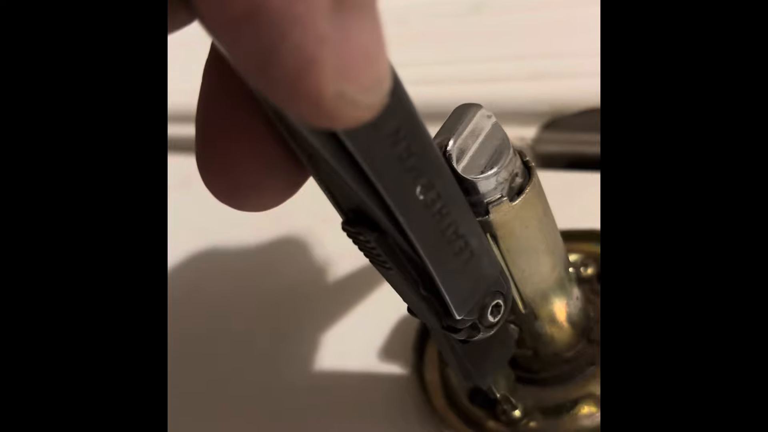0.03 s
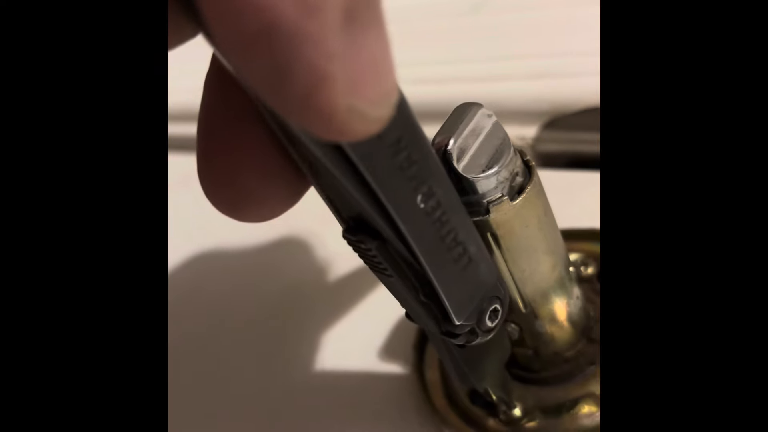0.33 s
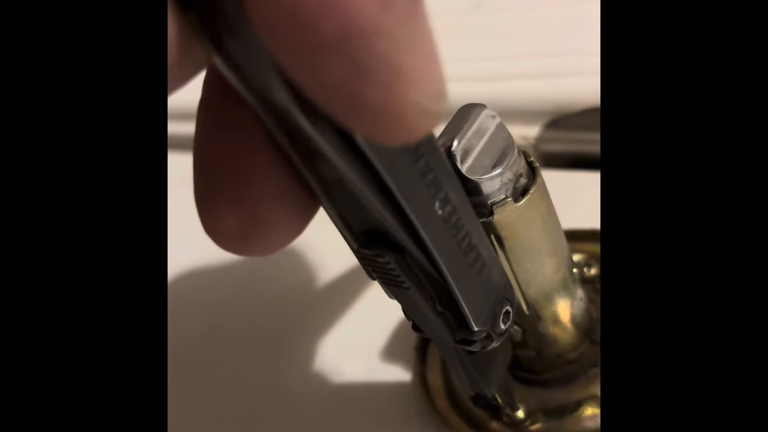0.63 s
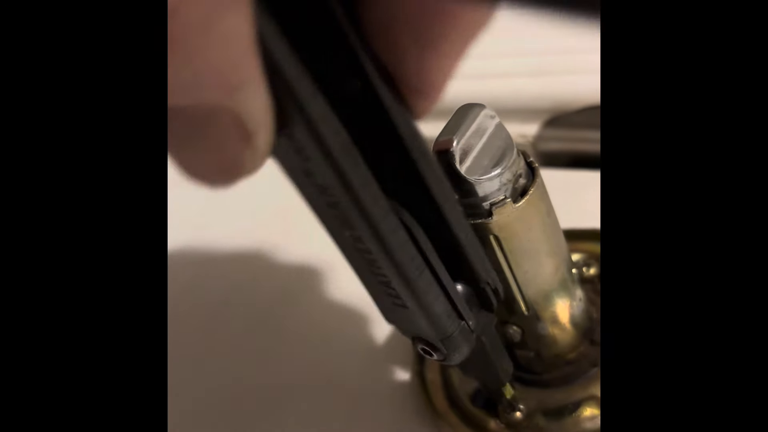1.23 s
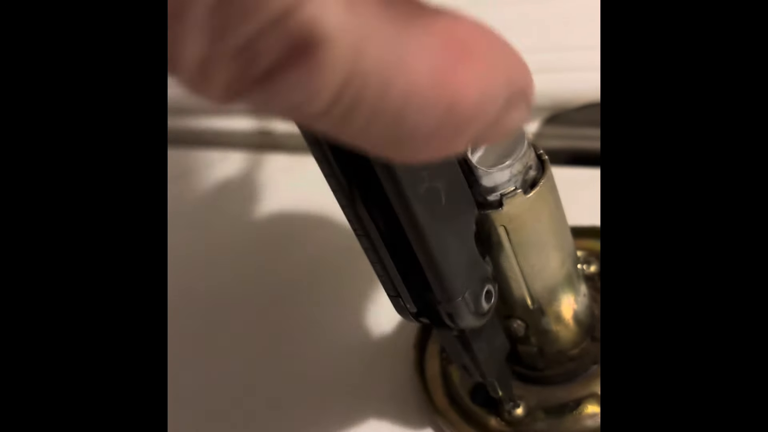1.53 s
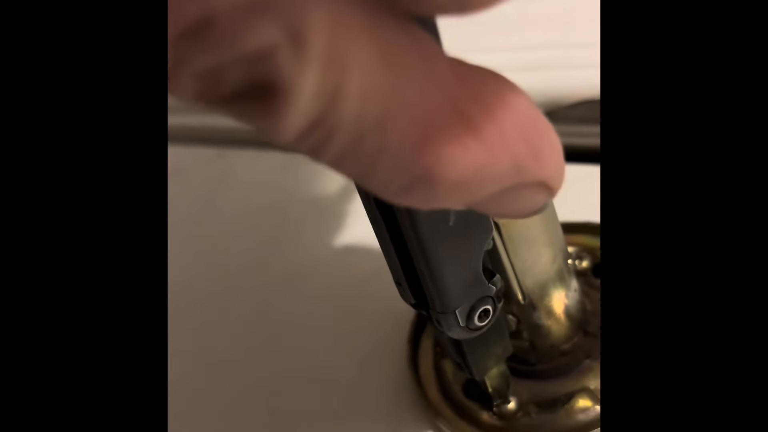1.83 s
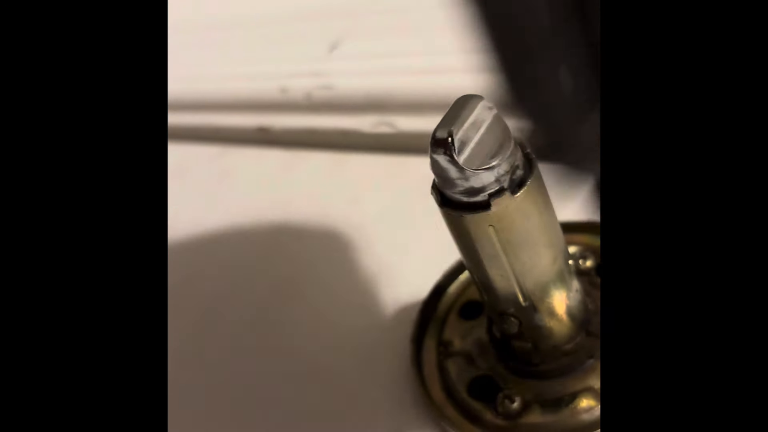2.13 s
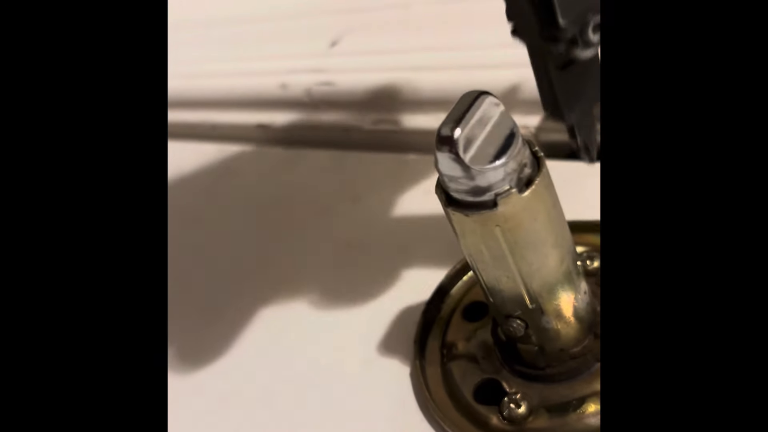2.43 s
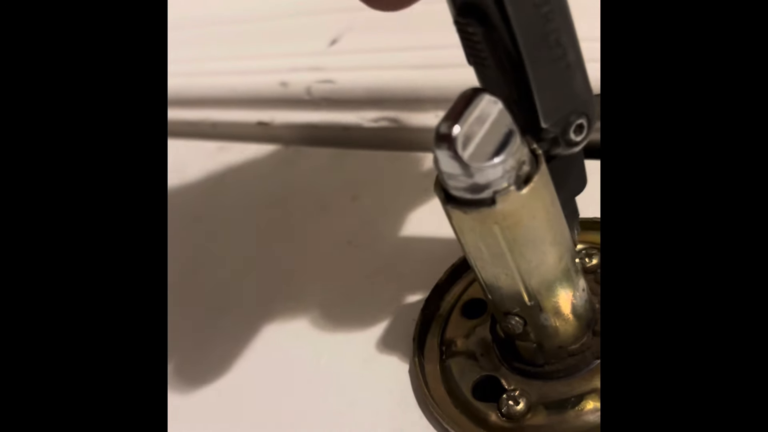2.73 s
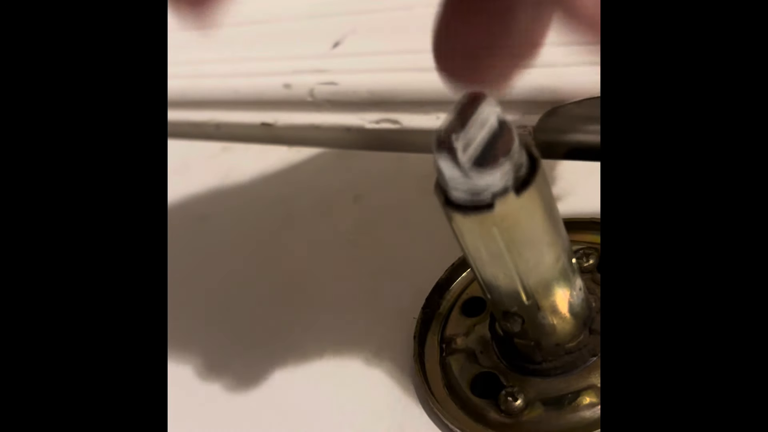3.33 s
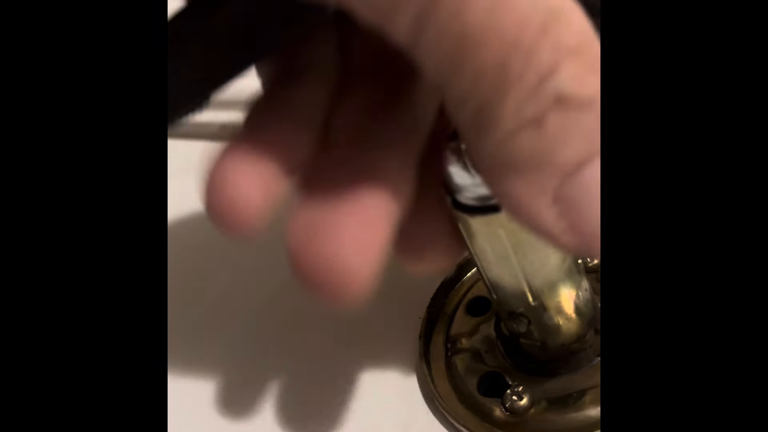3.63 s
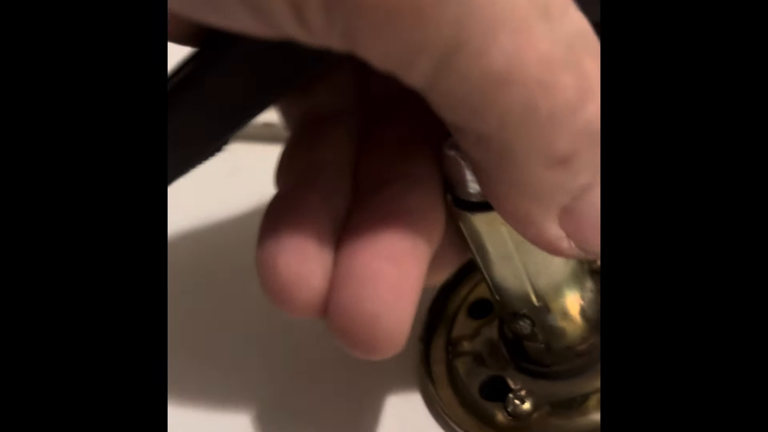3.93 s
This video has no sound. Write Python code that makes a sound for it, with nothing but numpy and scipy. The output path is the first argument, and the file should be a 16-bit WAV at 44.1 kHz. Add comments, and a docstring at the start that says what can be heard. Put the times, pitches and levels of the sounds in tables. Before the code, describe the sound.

Steel tool ticking against a brass door knob, ending in low hand thumps and rattling.

```python
"""A low hum wavers in a small room, and almost at once a steel multi-tool starts working at the spindle
and brass plate of a door knob. Each contact ticks the tool, knocks the door and rings the hardware;
in between, metal and fingers rub with a grainy hiss and scrape. Near the end the hum swells briefly,
a hand bumps about on the door and the hardware clatters."""
import sys
import numpy as np
from scipy import signal
from scipy.fft import rfft, irfft, next_fast_len
from scipy.io import wavfile
from scipy.ndimage import map_coordinates

SR = 44100
rng = np.random.default_rng(int(sys.argv[2]) if len(sys.argv) > 2 else 0)


def unload_audio(sound):
    """Save the sound as a 16-bit wav file, at the path given as the first command line argument."""
    columns = np.transpose(np.atleast_2d(sound))
    # keep every value between -1 and 1, then stretch to whole-number steps
    steps = np.round(np.clip(columns, -1, 1) * 32767)
    wavfile.write(sys.argv[1], SR, steps.astype(np.int16))


N = 176400

# Level of the hum over time, swelling as the hand bumps the door: time_s, level_db
HUM_LEVEL = [(0.0, -38.5), (3.11, -40), (3.31, -26.5), (4.0, -55)]
# Room tone EQ: freq_hz, gain_db
ROOM_TONE_EQ = [(25, -7.5), (70, 12), (200, -14.5), (1200, -42), (1950, -38.5), (2700, -45), (16000, -58.5)]
# Rubbing strokes: start_s, end_s, hiss_db, scrape_db, rumble_db
STROKES = [(0.137, 0.293, -77, -65.5, -38.5), (0.48, 0.862, -99, -73, -58.5),
           (0.931, 0.97, -99, -69.5, -61.5), (1.1, 1.173, -78.5, -74.5, -60.5),
           (1.289, 1.499, -71, -70, -65.5), (1.484, 1.718, -67.5, -56.5, -43.5),
           (1.884, 2.225, -74.5, -73.5, -60.5), (3.076, 3.206, -75.5, -100, -69),
           (3.201, 3.275, -60.5, -97, -53), (3.33, 3.65, -69, -55.5, -56.5),
           (3.694, 3.715, -59.5, -52.5, -56), (3.742, 4.006, -86, -63, -55.5)]
# Bright hiss of skin and steel: freq_hz, gain_db
HISS_EQ = [(1500, -10), (3000, -0.5), (9000, -4), (16000, -10.5)]
# Midrange body of the scrape: freq_hz, gain_db
SCRAPE_EQ = [(250, 3), (570, 3.5), (850, -3.5), (2100, -11.5), (4000, -26.5)]
# Rumble of the grip in the door: freq_hz, gain_db
RUMBLE_EQ = [(50, -9), (180, 4.5), (280, -3), (1200, -58.5)]
# Resonances of the knob's hardware: pitch_hz, gain_db
HARDWARE_MODES = [(1945, -4), (2170, -20), (2750, -4.5), (3370, -1)]
# Metal contacts, levels before the mix trims: start_s, tick_db, knock_db, ring_db, ring_hz
CONTACTS = [(.1415,-66,-55.5,-50,2140), (.1585,-42,-57,-49.5,8390), (.1625,-48.5,-45.5,-45,8300),
            (.1793,-43,-50,-37.5,3250), (.183,-36.5,-42.5,-44.5,4220), (.2335,-51,-54,-61,635),
            (.5705,-80,-63,-58.5,1570), (.7905,-48,-62,-47.5,1054), (1.3023,-33.5,-55.5,-36,12460),
            (1.4311,-48,-59,-57,1950), (1.453,-68,-58,-49,825), (1.4946,-37,-47,-38,1890),
            (1.7045,-36.5,-47.5,-44,1950), (1.904,-52,-60,-50,1440), (1.9234,-65,-51,-37.5,2005),
            (1.9561,-51.5,-56,-52,3300), (3.2095,-42,-79.5,-46.5,4840), (3.339,-38,-34,-36.5,1927),
            (3.3485,-40,-34.5,-31,2010), (3.3845,-47,-35.5,-38.5,1940), (3.438,-35,-47,-42,6800),
            (3.4785,-26.5,-50.5,-35,12860), (3.479,-37.5,-43.5,-28.5,2380), (3.692,-59,-38,-36.5,825),
            (3.8875,-64,-53.5,-42,1740), (3.909,-38.5,-37.5,-42,8000), (3.9225,-46,-36,-29,1960)]
# Resonances of the steel tool: pitch_hz, gain_db
TOOL_MODES = [(6783, -19), (7640, -17), (8700, -15.5)]
# Sharp tick of the tool: freq_hz, gain_db
TICK_EQ = [(3000, -31.5), (4500, -3), (5700, 10.5), (9000, -11.5), (12000, -26)]
# Resonances of the door: pitch_hz, gain_db
DOOR_MODES = [(750, 1), (817, -3.5), (1130, -1), (1350, -11.5)]
# Dull knock of the door: freq_hz, gain_db
KNOCK_EQ = [(100, -2), (800, -1), (1400, -4.5), (3500, -28)]
# Soft hand bumps, levels before the mix trims: start_s, level_db, pitch_hz
BUMPS = [(3.188, -26, 99), (3.234, -12.5, 107.6), (3.256, -18.5, 117), (3.282, -24, 270),
         (3.293, -12, 108.3), (3.332, -14.5, 179), (3.351, -14, 81.3), (3.39, -15, 123.6),
         (3.418, -15.5, 111), (3.438, -12, 95), (3.476, -14.5, 104.8), (3.526, -15, 136.5),
         (3.546, -17, 71.4), (3.613, -30, 102)]
# Bassy boom of the door: freq_hz, gain_db
BOOM_EQ = [(25, -18), (120, 6.5), (300, -5.5), (500, -27), (1500, -85)]
# Phase by which the left channel leads the right: freq_hz, lead_rad
LEFT_LEAD = [(0, 0), (1600, 0.74), (2700, 2.5), (4700, 0.95), (5800, 3.5), (16000, 15.5)]
# Stereo balance: freq_hz, left_minus_right_db
BALANCE = [(120, -0.5), (600, -6), (4400, 0.9)]


def amp(db):
    """Decibels to gain."""
    return 10 ** (np.asarray(db) / 20)


def unit(x):
    """Scale to rms 1."""
    return x / np.sqrt(np.mean(x ** 2) + 1e-20)


def along(points, hz):
    """Read (freq_hz, value) points along a log frequency axis."""
    freqs, values = np.transpose(points)
    return np.interp(np.log(hz + 1), np.log(freqs + 1), values)


def wobble(rate_hz):
    """A smooth random modulator with rate_hz knots a second."""
    knots = rng.standard_normal(int(N * rate_hz / SR) + 4)
    return map_coordinates(knots, [np.arange(N) * rate_hz / SR])


def filtered(x, response):
    """Filter x by a complex response, given as a function of frequency."""
    n = x.shape[-1]
    padded = next_fast_len(n + 8192)
    return irfft(rfft(x, padded) * response(np.fft.rfftfreq(padded, 1 / SR)), padded)[..., :n]


def noise(eq, size=N):
    """Noise through an EQ curve, at rms 1."""
    return unit(filtered(rng.standard_normal(size), lambda hz: amp(along(eq, hz))))


def fade(t, t60):
    """Exponential decay, 60 dB down after t60 seconds."""
    return np.exp(-np.log(1000) * t / t60)


def add(track, start_s, sound):
    """Mix a sound in at start_s."""
    part = track[max(round(start_s * SR), 0):][:len(sound)]
    part += sound[:len(part)]


def hum_bed(pitch_hz=64.03, drift_hz=1.637, waver_db=2, room_tone_db=-50):
    """A low hum wavers in pitch and level over faint room tone."""
    phase = 2 * np.pi * np.cumsum(pitch_hz + drift_hz * wobble(12)) / SR
    hum_level_db = np.interp(np.arange(N) / SR, *np.transpose(HUM_LEVEL))
    hum = amp(hum_level_db + waver_db * wobble(9.99)) * unit(np.sin(phase))
    return hum + amp(room_tone_db) * noise(ROOM_TONE_EQ)


def friction(eq, grain_hz, grain_db):
    """Surfaces catch and let go: noise with a grain and a slower flutter in its level."""
    return unit(noise(eq) * amp(grain_db * wobble(grain_hz) + 1.1 * wobble(24.87)))


def singing_hardware(scrape, level_db=-14, width_hz=81):
    """The metallic ring that scraping draws from the hardware's modes."""
    def resonances(freq):
        return sum(amp(db) / (1 + 2j * (freq - hz) / width_hz) for hz, db in HARDWARE_MODES)
    return amp(level_db) * unit(filtered(scrape, resonances))


def rubbing(rise_s=0.015, release_t60=0.28):
    """In each stroke skin and steel hiss and scrape, and the grip rumbles in the door."""
    t = np.arange(N) / SR
    hiss = friction(HISS_EQ, grain_hz=410, grain_db=1.5)
    scrape = friction(SCRAPE_EQ, grain_hz=120, grain_db=4.0)
    scrape = scrape + singing_hardware(scrape)
    rumble = friction(RUMBLE_EQ, grain_hz=40, grain_db=0.5)
    power = np.zeros((3, N))  # one row a layer; overlapping strokes add in power
    for start_s, end_s, *levels_db in STROKES:
        rise = np.clip((t - start_s) / rise_s + 0.5, 0, 1)
        release = fade(np.maximum(t - end_s, 0), release_t60)
        power += np.outer(amp(levels_db), rise * release) ** 2
    return np.sum(np.sqrt(power) * [hiss, scrape, rumble], axis=0)


def strike(modes, eq, crack_t60, ring_db, ring_t60, tail_db, attack_s, scatter_db=4):
    """One blow: a crack, ringing modes and a dense tail, coloured at random as no two land alike."""
    t = np.arange(SR // 4) / SR
    ring = np.zeros(len(t))
    for hz, db in modes:
        gain = amp(db + ring_db + rng.normal(0, scatter_db))
        ring += gain * np.sin(2 * np.pi * (hz * t + rng.random()))
    ripple_hz = np.linspace(0, SR / 2, 90)
    ripple_db = rng.normal(0, scatter_db, size=len(ripple_hz))
    burst = unit(filtered(noise(eq, len(t)), lambda hz: amp(np.interp(hz, ripple_hz, ripple_db))))
    crack = burst * fade(t, crack_t60)
    tail = (ring + amp(tail_db) * burst) * fade(t, ring_t60)
    return (crack + tail) * (1 - np.exp(-t / attack_s))


def hardware_ping(hz, attack_s=0.00023):
    """The struck spot cracks around its own resonance and rings briefly."""
    t = np.arange(SR // 8) / SR
    crack = noise([(hz / 4, -40), (hz, 0), (hz * 4, -40)], len(t)) * fade(t, t60=0.011)
    ring = np.sin(2 * np.pi * hz * t) * fade(t, t60=0.019)
    return (ring + 1.07 * crack) * (1 - np.exp(-t / attack_s))


def tool_contacts(tick_trim_db=-4.0, knock_trim_db=4.5):
    """Every contact ticks the tool, knocks the door and rings the spot where it lands."""
    track = np.zeros(N)
    for start_s, tick_db, knock_db, ring_db, ring_hz in CONTACTS:
        tick = strike(TOOL_MODES, TICK_EQ, crack_t60=0.0079, ring_db=1.5, ring_t60=0.028,
                      tail_db=-18, attack_s=0.00017)
        knock = strike(DOOR_MODES, KNOCK_EQ, crack_t60=0.019, ring_db=-17.5, ring_t60=0.083,
                       tail_db=-14, attack_s=0.00067)
        add(track, start_s, amp(tick_db + tick_trim_db) * tick)
        add(track, start_s, amp(knock_db + knock_trim_db) * knock)
        add(track, start_s, amp(ring_db) * hardware_ping(ring_hz))
    return track


def hand_bumps(cycles_to_peak=0.46, swing_trim_db=-1, boom_trim_db=-11.5, boom_attack_s=0.0047):
    """A soft hand gives the door one low swing and a short boom."""
    track = np.zeros(N)
    t = np.arange(SR // 4) / SR
    for start_s, level_db, pitch_hz in BUMPS:
        age = t * pitch_hz / cycles_to_peak  # 1 at the top of the swing's envelope
        swing = age ** 2 * np.exp(2 * (1 - age)) * np.sin(2 * np.pi * pitch_hz * t)
        boom = noise(BOOM_EQ, len(t)) * fade(t, t60=0.19) * (1 - np.exp(-(t / boom_attack_s) ** 2))
        add(track, start_s, amp(level_db) * (amp(swing_trim_db) * swing + amp(boom_trim_db) * boom))
    return track


def small_room(x):
    """A short, dull reverb with little bass, different on each side."""
    t = np.arange(SR // 3) / SR
    tail = rng.standard_normal((2, len(t))) * fade(t, t60=0.17)
    wet = signal.fftconvolve(x[None], tail / np.linalg.norm(tail[0]), axes=1)[:, :N]
    return filtered(wet, lambda hz: amp(along([(60, -10), (400, 7.0), (6000, -12.5)], hz)))


def stereo_placement(hz):
    """Left and right responses: the left leads in phase, while the mids lean right."""
    sides = np.array([[0.5], [-0.5]])
    lead_rad = np.interp(hz, *np.transpose(LEFT_LEAD))
    return amp(sides * along(BALANCE, hz)) * np.exp(1j * sides * lead_rad)


def scene(reverb_send_db=-7):
    """All layers share one close-up position, with the room behind them."""
    close = tool_contacts() + hand_bumps() + rubbing() + hum_bed()
    return filtered(close, stereo_placement) + amp(reverb_send_db) * small_room(close)


def record(dry, cutoff_hz=16400):
    """A brick-wall low-pass takes off the very top."""
    return filtered(dry, lambda hz: hz < cutoff_hz)


dry = scene()
out = record(dry)
unload_audio(out)
```